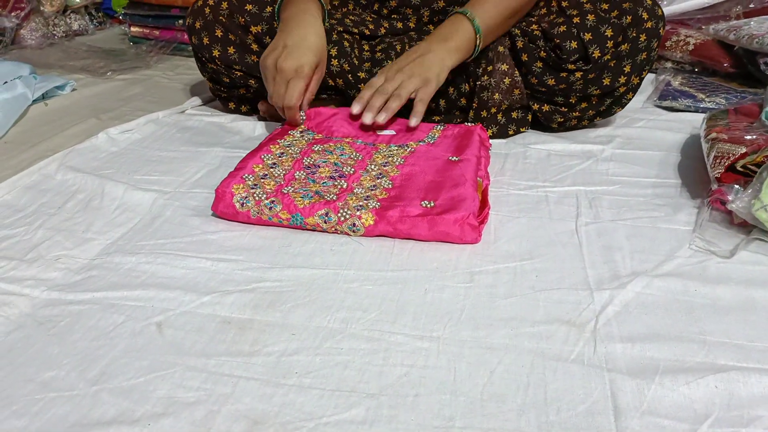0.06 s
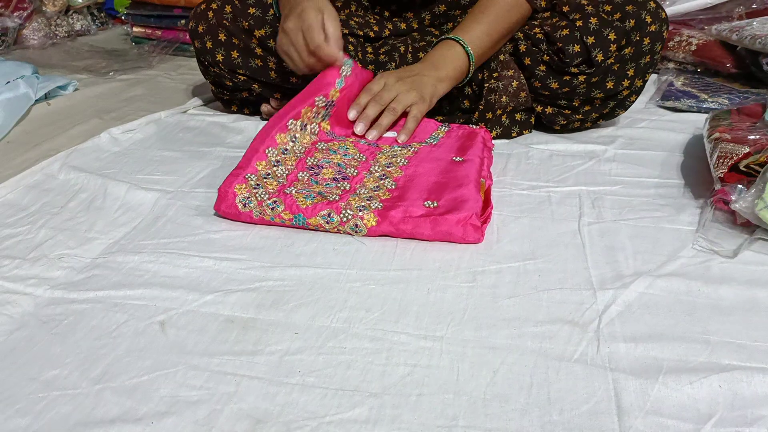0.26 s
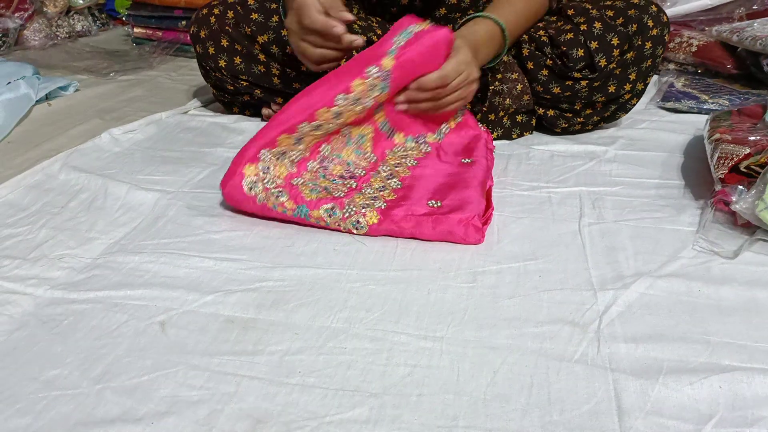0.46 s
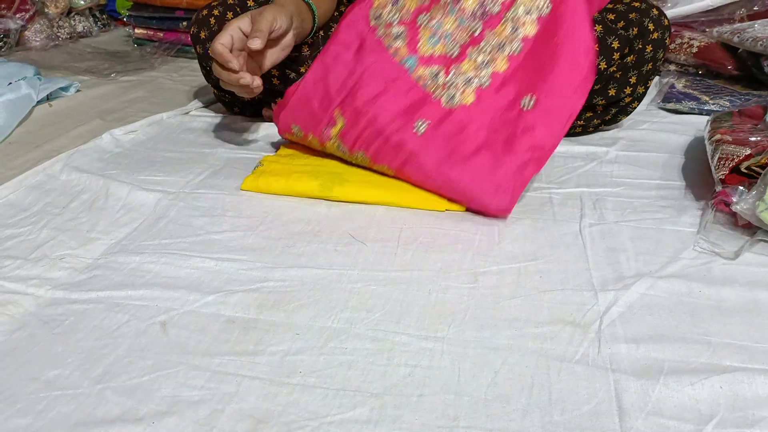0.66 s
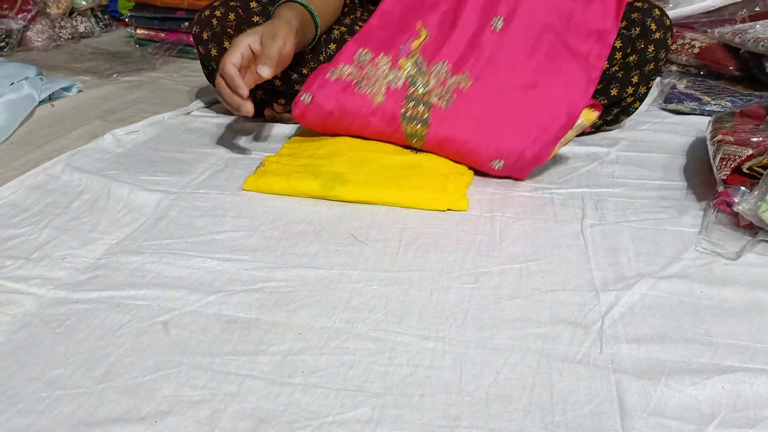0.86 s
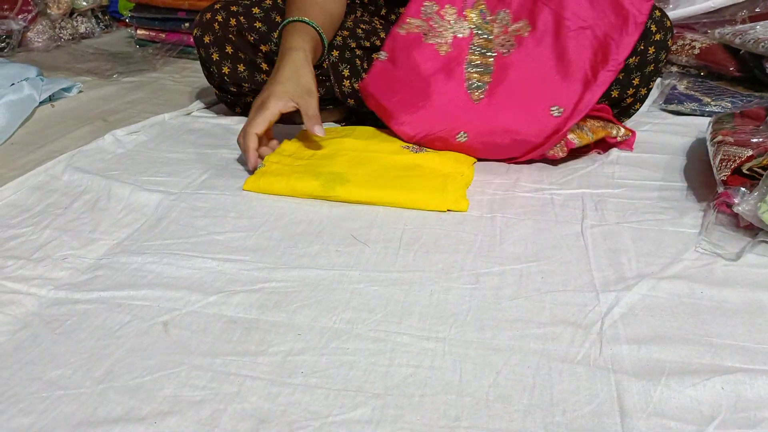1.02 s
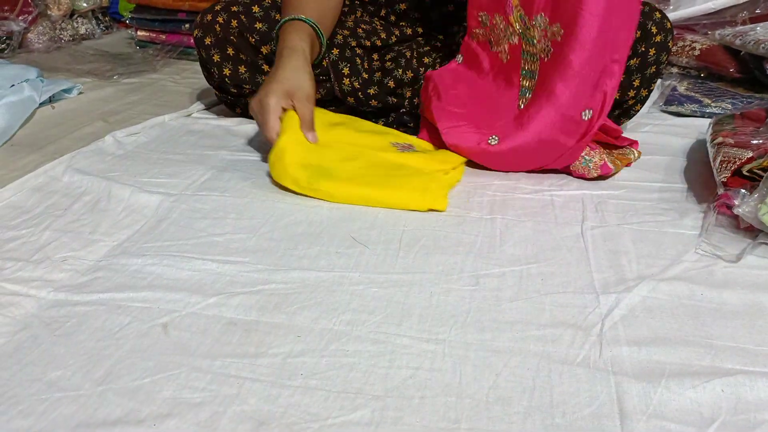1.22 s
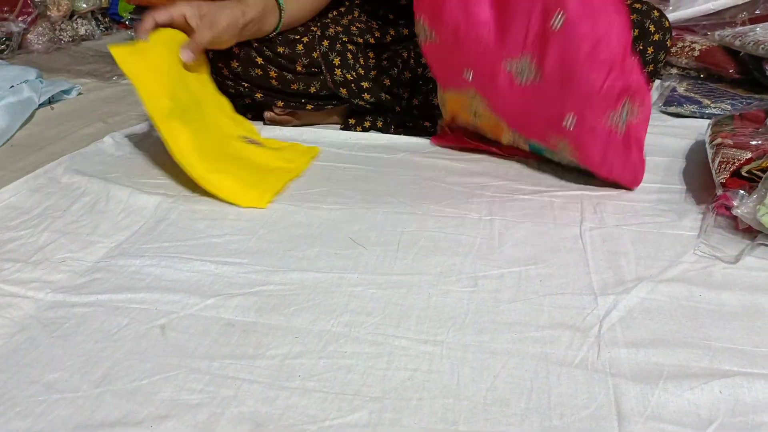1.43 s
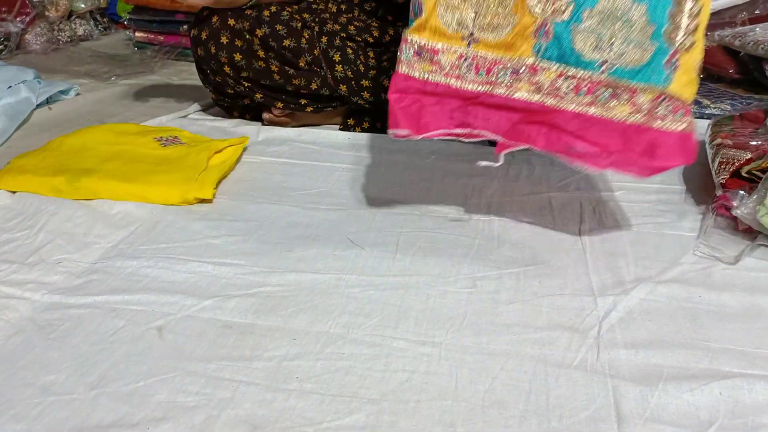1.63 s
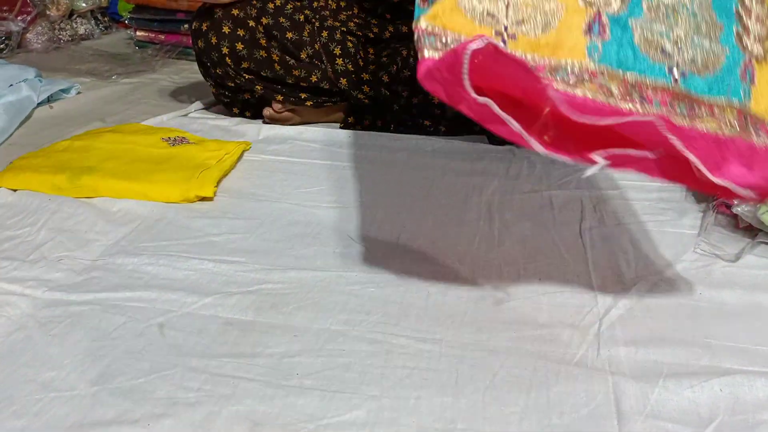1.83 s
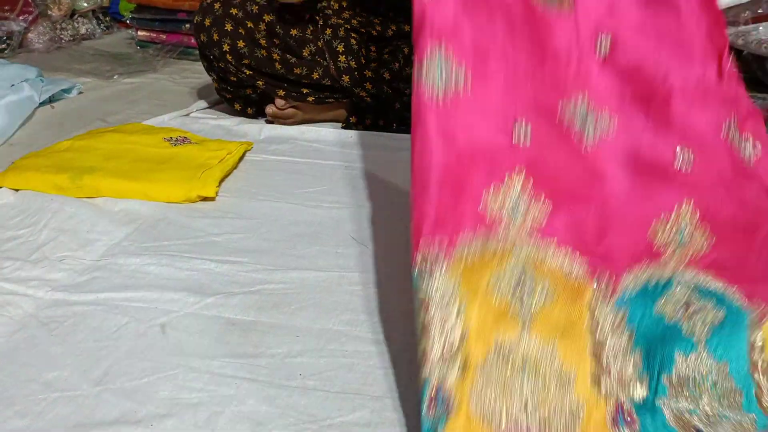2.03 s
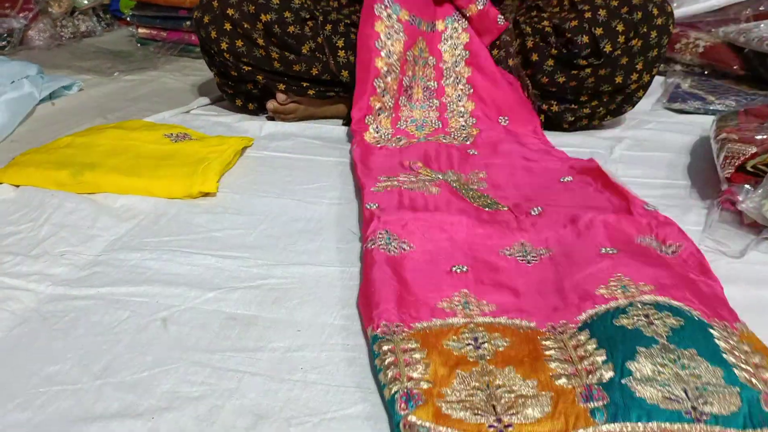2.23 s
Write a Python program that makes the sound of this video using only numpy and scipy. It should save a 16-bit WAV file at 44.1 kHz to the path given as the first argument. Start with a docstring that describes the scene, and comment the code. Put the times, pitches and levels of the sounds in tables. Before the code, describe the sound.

Silky embroidered cloth is lifted and shifted with faint rustles and soft puffs, pauses briefly, then is shaken open in a quick, much louder double flap with tiny ticks, close in a quiet, damped room.

```python
"""Embroidered cloth in a quiet room

Silky cloth is lifted, shifted and shaken open: folds push soft puffs of air (short enveloped cosines),
the weave rustles and hisses (shaped noise with random grains) and rubs on itself (swelling band noise).
Sequins tick (decaying noise bursts), a bangle tinkles (swelling sine tones), and a narrow shimmer
(fluttering band noise) comes and goes over the room tone. A short damped tail follows flaps and trinkets."""
import sys
import numpy as np
from scipy import signal
from scipy.fft import rfft, irfft, next_fast_len
from scipy.io import wavfile
from scipy.ndimage import uniform_filter1d

SR = 44100
rng = np.random.default_rng(int(sys.argv[2]) if len(sys.argv) > 2 else 0)


def to_wav(s):
    """Save 16-bit WAV."""
    ch = np.atleast_2d(s).T  # columns
    pcm = np.round(np.clip(ch, -1, 1) * 32767)  # PCM
    wavfile.write(sys.argv[1], SR, pcm.astype(np.int16))


N = 100459

# Level of the room tone: time_s, level_db
ROOM_TONE_LEVEL = [(0, -63.5), (.8, -68), (1.5, -65), (1.75, -67.5), (2.28, -66.5)]
# Spectrum of the room tone: frequency_hz, relative_density_db
ROOM_TONE_SPECTRUM = [(18, -29), (30, 10.5), (199, -5), (449, -8), (988, -9), (1280, -10.5), (6720, -21),
                      (16000, -22.5)]
# Left-right correlation of the room tone: frequency_hz, correlation (no unit)
ROOM_TONE_CORRELATION = [(60, 0.17), (640, 0.028), (1400, 0.0064)]
# Narrow shimmer in the background: time_s, level_db
SHIMMER_LEVEL = [(0, -70), (.18, -76), (.39, -80), (.45, -95), (1.95, -95), (2.13, -80)]
# Sequin ticks: start_s, peak_db, centre_hz, width_octaves, left_over_right_db
SEQUIN_TICKS = [(0.133, -53.5, 12700, .5, 8), (0.857, -46.5, 9700, 0.92, 14.5), (1.1112, -52, 11000, 1, 16),
                (1.2276, -55, 4800, .6, 11), (1.357, -55, 6500, 0.37, -10), (1.8684, -44.5, 7900, 1, -11),
                (1.927, -32.5, 3470, 0.089, 1), (1.928, -36, 6100, 0.37, -3), (2.25, -43.5, 2910, 0.2, 9),
                (2.2501, -45.5, 5860, 0.68, 11)]
# Bangle tones: peak_s, peak_db, pitch_hz, swell_s
BANGLE_TINKLES = [(1.565, -66, 6820, .01), (1.695, -62, 6770, .014)]
# Short rubs of weave on weave: start_s, nominal_length_s, level_db, centre_hz, width_octaves
WEAVE_RUBS = [(0.092, 0.0072, -63, 2660, 0.34), (0.463, 0.11, -71, 6400, 0.6),
              (0.529, 0.061, -62.5, 4100, 0.86), (0.697, 0.031, -70.5, 7760, 1),
              (0.873, 0.046, -64.5, 9300, 0.66), (0.933, 0.052, -61, 8300, 0.75),
              (0.939, 0.019, -50, 1190, 0.4), (.948, 0.027, -54, 2240, 0.14),
              (0.985, 0.053, -60, 8800, 0.77), (1.023, 0.046, -58, 7500, 1.1),
              (1.27, 0.053, -66, 8900, 1.5), (1.362, 0.054, -66.5, 6000, 0.81),
              (1.476, 0.04, -58.5, 7740, 2.8), (1.519, 0.34, -72, 6900, 0.12),
              (1.692, 0.18, -69.5, 9900, 0.23), (1.856, 0.14, -56.5, 7700, 2.2),
              (2.214, 0.057, -66.5, 8200, 1.8)]
# Movement of the cloth: time_s, rustle_level_db, bass_over_rustle_db, upper_over_rustle_db
CLOTH_MOVEMENT = [(.77, -76, 6, -1), (.8, -62.5, 0, -15), (.87, -64, 6, -9.5), (.89, -53, -13, -6),
                  (.92, -54.5, -16, -13.5), (.95, -46, -17, -12.5), (.98, -61.5, -9, 0),
                  (1.0, -52, -11, -10), (1.045, -45.5, -25, -11), (1.062, -56.5, -15, -6.5),
                  (1.2, -55.5, -14, -4.5), (1.29, -54.5, 0, -4.5), (1.38, -55, -14, -3),
                  (1.42, -57, 9.5, -12.5), (1.49, -62, 6, -6), (1.53, -77, 3, 5), (1.852, -86, 10, 3),
                  (1.864, -45.5, -3.5, -14), (1.93, -38.5, -3, -10.5), (1.95, -51, 3.5, -10.5),
                  (2.01, -38, -5, -14), (2.06, -45.5, -2.5, -10.5), (2.11, -52, 1, -7.5),
                  (2.19, -57, -13, -16.5), (2.21, -81.5, 10, 5.5)]
# Weave sliding on weave: time_s, level_db
WEAVE_SLIDE = [(0, -76), (.85, -73.5), (1.1, -70.5), (1.3, -63.5), (1.7, -67), (1.95, -71.5), (2.04, -55.5),
               (2.1, -64), (2.2, -73.5), (2.28, -62)]
# Spectra of the cloth's three rustle ranges and of its hiss: frequency_hz, relative_density_db
BASS_SPECTRUM = [(35, -40), (60, -17), (75, -17), (161, 2), (350, -5.5), (460, -12), (770, -120)]
BODY_SPECTRUM = [(160, -51), (280, -20), (335, -31), (470, -11), (774, -17.5), (1200, -20.5), (1650, -38),
                 (2140, -67), (3630, -120)]
UPPER_SPECTRUM = [(940, -78), (1600, -13.5), (2070, -4), (2450, -2), (2800, -11), (3400, -9.5), (4800, -19),
                  (10600, -120)]
HISS_SPECTRUM = [(2470, -14.5), (4200, -4.5), (5200, -5), (6800, 0), (9300, -8.5), (13100, -4.5),
                 (15100, -0.5), (16000, -12)]
# Left-right correlation of the cloth noise: frequency_hz, correlation (no unit)
CLOTH_CORRELATION = [(60, 1), (240, 0.94), (950, 0.59), (3770, -0.11), (15000, -0.19)]
# Puffs of flapping folds, one with an added higher partial (the row near 1 kHz at 0.313 s):
# peak_s, drive_db, pitch_hz, cycles (no unit), snap_over_drive_db
FLAP_PUFFS = [(.312, -52, 477, 9.5, -29), (0.313, -53, 970, 11.4, -33), (.347, -53, 496, 6.5, -20),
              (.804, -45.5, 248, 4.6, -28), (.82, -42.5, 470, 3.9, -16), (.888, -41.5, 836, 6, -10),
              (.931, -34.5, 462, 11, -11), (1.017, -32.5, 420, 1.2, -27), (1.028, -34.5, 436, 3.25, -26),
              (1.045, -37, 423, 6.1, -26), (1.259, -41, 156, 3.3, -5.5), (1.287, -35.5, 185.7, 5.4, -18),
              (1.33, -39.5, 515, 5, -32), (1.42, -35, 490, 3.7, -35), (1.442, -36.5, 440, 4.6, -39),
              (1.464, -39.5, 588, 6.9, -36), (1.479, -31.5, 337, 0.85, -28), (1.874, -25.5, 413, 1.4, -17),
              (1.88, -26.5, 520, 1.5, -31), (1.886, -31.5, 217, 2.9, -30), (1.915, -22, 550, 2.3, -29),
              (1.924, -15, 664, 2.16, -19), (1.929, -20.5, 577, 1.4, -28), (1.9604, -17.5, 935, 2.14, -9.5),
              (1.964, -21.5, 204, 2, -21), (1.972, -31, 208, 2.1, -29), (2.0, -22.5, 467, 3.9, -18),
              (2.0045, -22, 520, 1.5, -11), (2.018, -23, 428, 1.4, -22), (2.036, -23.5, 670, 2.9, -11),
              (2.041, -27.5, 497, 2.5, -26), (2.083, -25, 404, 1.3, -21)]
# Heavy folds landing on the mattress: approximate_peak_s, drive_db, pitch_hz
FOLD_LANDINGS = [(1.269, -48, 50.4), (1.3, -46, 60), (1.965, -34.5, 127)]
# Difference in colour of the two channels: frequency_hz, left_over_right_db
CHANNEL_COLOUR = [(60, -3.5), (270, -0.5), (2000, 1), (3300, 0), (5500, -6.5), (9080, 4.5), (15000, -8.5)]

SHIMMER_HZ, SHIMMER_WIDTH_HZ = 3950, 140
FLUTTER_HZ, FLUTTER_RMS_DB = 30, 1.5
TICK_T60_S, TICK_ATTACK_S = 0.01, 0.0002
RUB_ATTACK, RUB_RELEASE_S, RUB_PAN_DB = 0.13, 0.0089, 1  # attack as a share of the length
FLAP_LOW_HZ, FLAP_HIGH_HZ, FLAP_PAN_DB = 94, 1430, 2.5  # range in which a fold pushes air
SNAP_HZ, SNAP_CYCLES = 2290, 5.28
CRACK_HZ, CRACK_CYCLES, CRACK_DB = 4000, 2.6, -10  # bright edge of a snap, level relative to it
LANDING_CYCLES = 2.3
ROOM_T60_S, ROOM_DB, ROOM_SIDE = 0.21, -10.5, 0.53
PATCHY_RMS_DB = 1.3
TOP_HZ = 15800  # nothing sounds above this


def amp(db):
    """Decibel law: 20 dB is a tenfold amplitude."""
    return 10 ** (np.asarray(db) / 20)


def unit(x):
    """Normalisation to an rms of 1."""
    return x / np.sqrt(np.mean(x ** 2) + 1e-20)


def along(points, hz):
    """Interpolation of (Hz, value) points on a logarithmic frequency axis."""
    f, v = np.transpose(points)
    return np.interp(np.log(hz + 1), np.log(f + 1), v)


def curves(rows):
    """Linear interpolation in time: one value per sample for each column after the time."""
    s, *cols = np.transpose(rows)
    return [np.interp(np.arange(N) / SR, s, c) for c in cols]


def filtered(x, response):
    """Linear filtering: the spectrum is multiplied by a response of frequency."""
    m = next_fast_len(N + SR // 2)
    return irfft(rfft(x, m) * response(np.fft.rfftfreq(m, 1 / SR)), m)[..., :N]


def band(hz, centre_hz, width_octaves):
    """Gaussian band-pass response on an octave axis."""
    octaves = np.log2((hz + 1) / centre_hz)
    return np.exp(-(octaves / width_octaves) ** 2 / 2)


def patchy(pair):
    """Time-frequency modulation: random gain over patches of about 700 Hz by 50 ms."""
    z = signal.stft(pair, nperseg=512)[2]
    field = rng.standard_normal(z.shape[1:])
    field = uniform_filter1d(uniform_filter1d(field, size=8, axis=0), size=8, axis=1)
    return signal.istft(z * amp(PATCHY_RMS_DB * unit(field)), nperseg=512)[1][:, :N]


def rustle(spectrum, correlation, rate, spread_db, smooth):
    """Granular noise: uneven grains (rate per second) on a share of smooth noise, stereo, rms 1."""
    sizes = amp(spread_db * rng.standard_normal(N).clip(-2, 2))
    grains = (rng.random(N) < rate / SR) * sizes
    smooth = np.clip(smooth, 0, 1)
    envelope = np.sqrt(smooth) + np.sqrt(1 - smooth) * unit(grains)
    pair = envelope * rng.standard_normal((2, N))

    def response(hz):
        """Mid-side power split: the split angle is half the arc cosine of the correlation."""
        angle = np.arccos(np.clip(along(correlation, hz), -1, 1)) / 2
        return amp(along(spectrum, hz)) * [np.cos(angle), np.sin(angle)]

    mid, side = filtered(patchy(pair), response)
    return unit(np.array([mid + side, mid - side]))


def add(out, s, sound, pan_db):
    """Superposition: a sound is added at s seconds, placed by a left-right level difference."""
    part = out[:, round(s * SR):round(s * SR) + sound.shape[-1]]
    part += amp([[pan_db / 2], [-pan_db / 2]]) * sound[..., :part.shape[1]]


def puff(hz, cycles):
    """Damped pressure pulse: a push of air oscillates for a few cycles as it swells and dies."""
    cycles = max(cycles, .3)
    u = np.arange(SR // 8) / SR * hz / cycles
    envelope = (2.235 * u * np.exp(1 - 2.87 * u)) ** 2
    phase = rng.normal(0, 0.48)  # radians
    return envelope * np.cos(2 * np.pi * (u - .4) * cycles + phase)


def room_tone():
    """Coloured background noise, with microphone hiss, whose level slowly rises and falls."""
    noise = rustle(ROOM_TONE_SPECTRUM, ROOM_TONE_CORRELATION, rate=770, spread_db=-1.0, smooth=0.73)
    return amp(curves(ROOM_TONE_LEVEL)[0]) * noise


def shimmer():
    """Amplitude modulation: narrow-band noise flutters with low-passed noise."""
    carrier = filtered(rng.standard_normal((2, N)),
                       lambda hz: np.exp(-((hz - SHIMMER_HZ) / SHIMMER_WIDTH_HZ) ** 2))
    flutter = unit(filtered(rng.standard_normal(N), lambda hz: np.exp(-(hz / FLUTTER_HZ) ** 2)))
    return amp(curves(SHIMMER_LEVEL)[0]) * unit(carrier * amp(FLUTTER_RMS_DB * flutter))


def sequins():
    """Impact noise: each sequin tick is a band of noise with a fast onset and exponential decay."""
    out, t = np.zeros((2, N)), np.arange(SR // 10) / SR
    hz = np.fft.rfftfreq(len(t), 1 / SR)
    envelope = amp(-60 * t / TICK_T60_S) * (1 - np.exp(-t / TICK_ATTACK_S))
    for s, peak_db, centre_hz, width, pan_db in SEQUIN_TICKS:
        noise = rng.standard_normal(len(t))
        burst = irfft(rfft(noise) * band(hz, centre_hz, width)) * envelope
        add(out, s, amp(peak_db) * burst / np.abs(burst).max(), pan_db)
    return out


def bangle():
    """Single-mode ringing: each tinkle is one sine tone that swells and fades."""
    out, t = np.zeros((2, N)), np.arange(SR // 10) / SR
    for s, peak_db, tone_hz, swell in BANGLE_TINKLES:
        envelope = (t / swell * np.exp(1 - t / swell)) ** 2
        add(out, s - swell, amp(peak_db) * envelope * np.sin(2 * np.pi * tone_hz * t), 0.5)
    return out


def rubs():
    """Friction noise: each rub of the weave is a band of hiss that swells, holds and fades."""
    out, t = np.zeros((2, N)), np.arange(SR // 2) / SR
    hz = np.fft.rfftfreq(len(t), 1 / SR)
    for s, length, db, centre_hz, width in WEAVE_RUBS:
        grit = rng.standard_normal((2, len(t)))
        # lower rubs are more alike on the left and right
        grit += np.clip(900 / centre_hz, 0, 3) * grit.sum(axis=0)
        hiss = unit(irfft(rfft(grit) * band(hz, centre_hz, width)))
        swell = 1 - np.exp(-t / (RUB_ATTACK * length))
        fade = np.exp(-np.clip(t - length / 2, 0, 1) / (RUB_RELEASE_S + length / 4))
        add(out, s, amp(db) * swell * fade * hiss, RUB_PAN_DB)
    return out


def cloth():
    """Distributed friction: moving folds give dense grains in three ranges, the weave a hiss."""
    level_db, bass_db, upper_db = curves(CLOTH_MOVEMENT)
    body = rustle(BODY_SPECTRUM, CLOTH_CORRELATION, rate=1800, spread_db=3, smooth=0.59)
    bass = rustle(BASS_SPECTRUM, CLOTH_CORRELATION, rate=300, spread_db=-1.5, smooth=0.37)
    upper = rustle(UPPER_SPECTRUM, CLOTH_CORRELATION, rate=2200, spread_db=-1.5, smooth=0.85)
    folds = amp(level_db) * (body + amp(bass_db) * bass + amp(upper_db) * upper)
    hiss = rustle(HISS_SPECTRUM, CLOTH_CORRELATION, rate=9300, spread_db=3.5, smooth=0.47)
    return folds + amp(curves(WEAVE_SLIDE)[0]) * hiss


def landings():
    """Low-frequency impact: a heavy fold landing on the mattress gives a deep, soft puff."""
    out = np.zeros((2, N))
    for s, db, hz in FOLD_LANDINGS:
        add(out, s - 0.41 * LANDING_CYCLES / hz, amp(db) * puff(hz, LANDING_CYCLES), -1.5)
    return out


def flaps():
    """Air displacement: flapping folds give band-limited low puffs, each with a thin snap on top."""
    air, snaps = np.zeros((2, N)), np.zeros((2, N))
    for s, db, hz, cycles, snap_db in FLAP_PUFFS:
        add(air, s - 0.367 * cycles / hz, amp(db) * puff(hz, cycles), FLAP_PAN_DB)
        snap_hz = SNAP_HZ * amp(rng.normal(0, 0.28))  # pitch varies by about 3 %
        snap = puff(snap_hz, SNAP_CYCLES) + amp(CRACK_DB) * puff(CRACK_HZ, CRACK_CYCLES)
        add(snaps, s, amp(db + snap_db) * snap, FLAP_PAN_DB)

    def air_range(hz):
        """Band-pass response: half amplitude near each limit."""
        return 1 / (1 + (hz / FLAP_HIGH_HZ) ** 6) / (1 + (FLAP_LOW_HZ / (hz + 1)) ** 4)

    return snaps + filtered(air, air_range)


def room(x):
    """Reverberation: convolution with decaying noise, as in a damped room full of textiles."""
    t = np.arange(SR // 4) / SR
    decay = amp(-60 * t / ROOM_T60_S) * (t > .003)  # silent for the first 3 ms
    mid, side = rng.standard_normal((2, len(t))) * decay
    tail = np.array([mid + ROOM_SIDE * side, mid - ROOM_SIDE * side]) / np.linalg.norm(mid)
    return amp(ROOM_DB) * signal.fftconvolve(x.mean(axis=0)[None], tail, axes=1)[:, :N]


def scene():
    """Superposition of all sources; flaps, landings and trinkets also excite the room."""
    background = room_tone() + shimmer()
    near = sequins() + bangle() + landings() + flaps()
    return background + rubs() + cloth() + near + room(near)


def record(dry):
    """Spectral weighting: two channels of different colour; nothing sounds above 15.8 kHz."""
    def response(hz):
        """Half the level difference is given to each side, with opposite signs."""
        return amp(along(CHANNEL_COLOUR, hz) * np.array([[.5], [-.5]])) * (hz < TOP_HZ)

    return filtered(dry, response)


dry = scene()
out = record(dry)
to_wav(out)
```